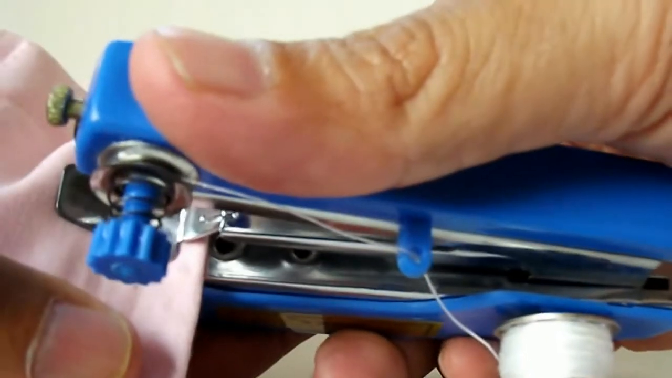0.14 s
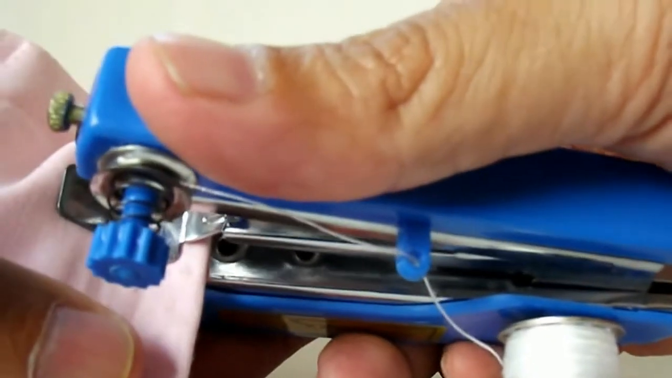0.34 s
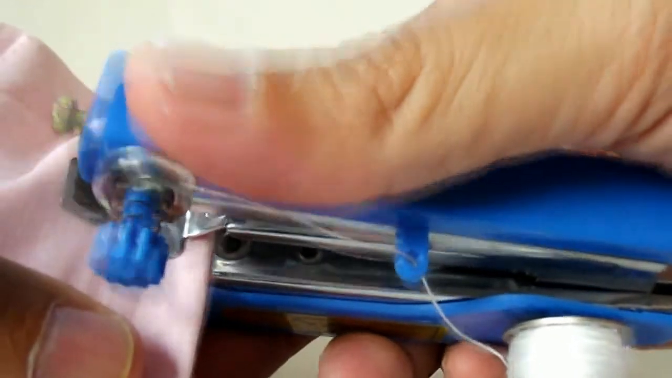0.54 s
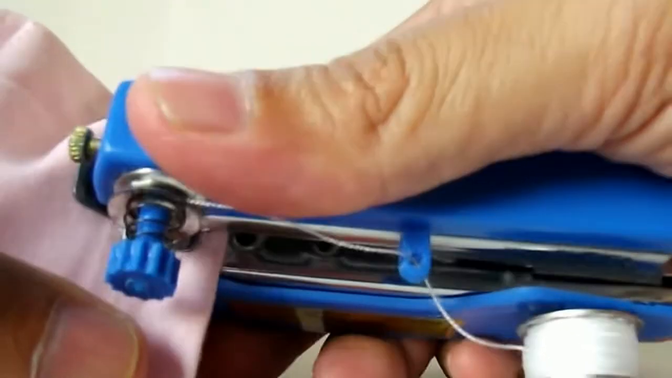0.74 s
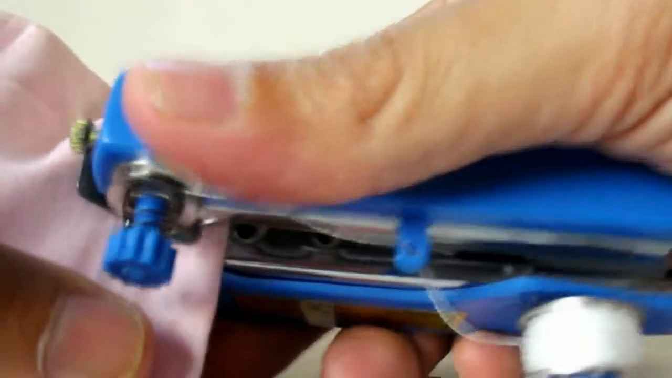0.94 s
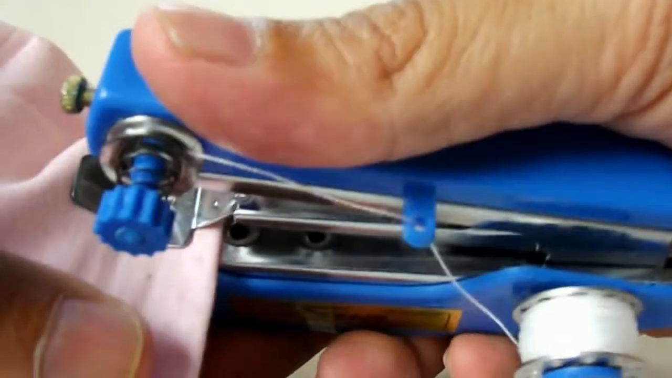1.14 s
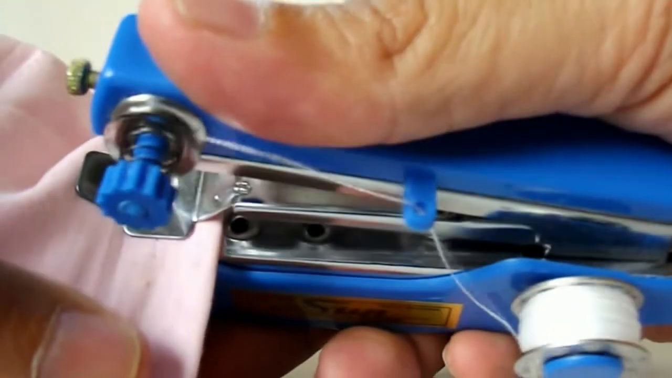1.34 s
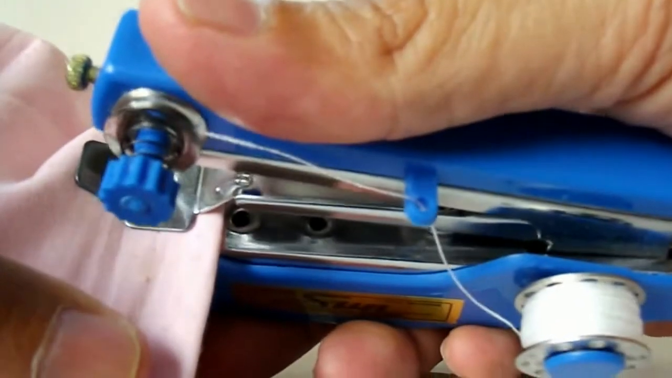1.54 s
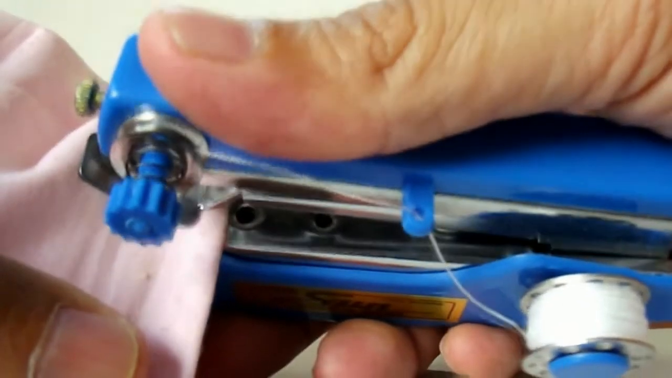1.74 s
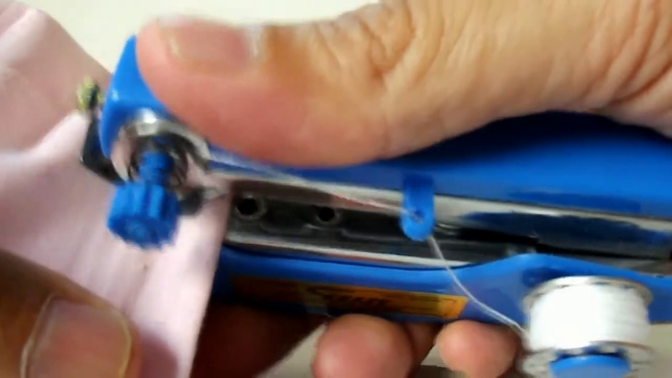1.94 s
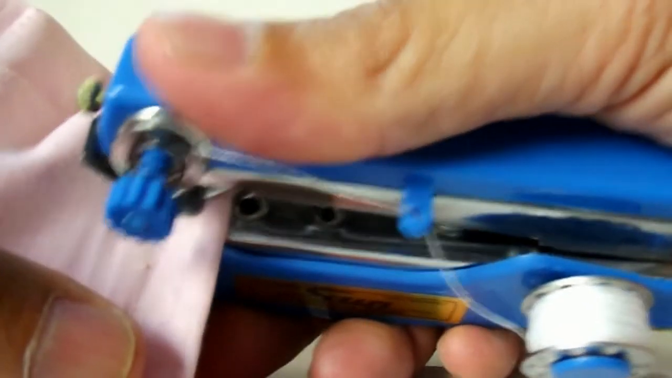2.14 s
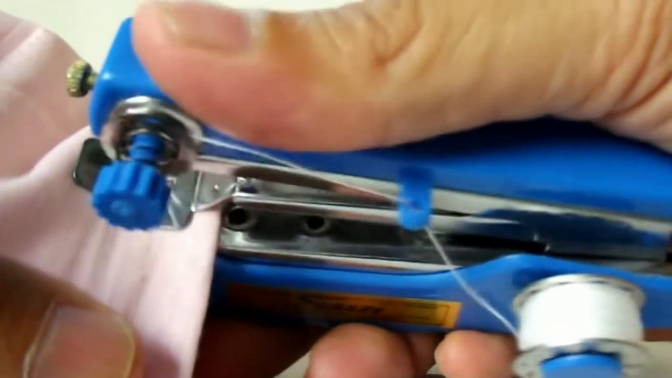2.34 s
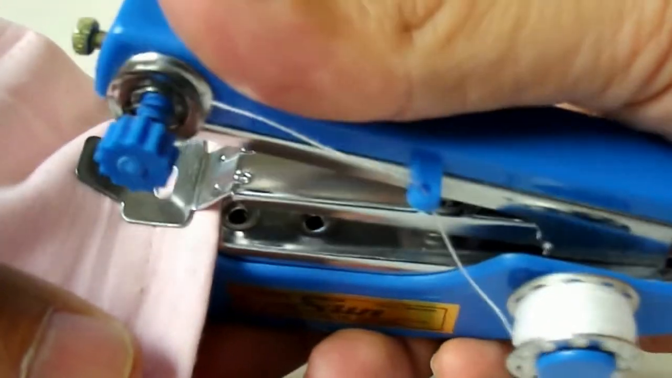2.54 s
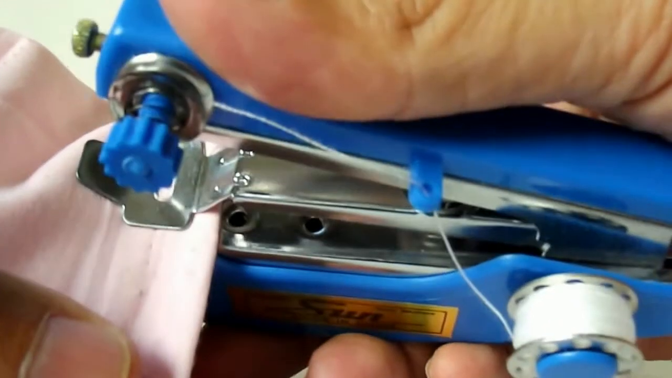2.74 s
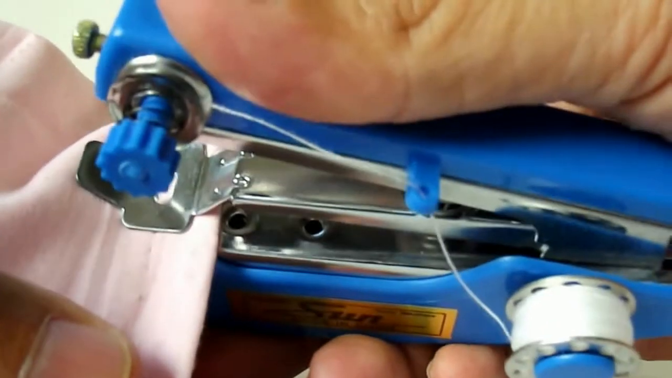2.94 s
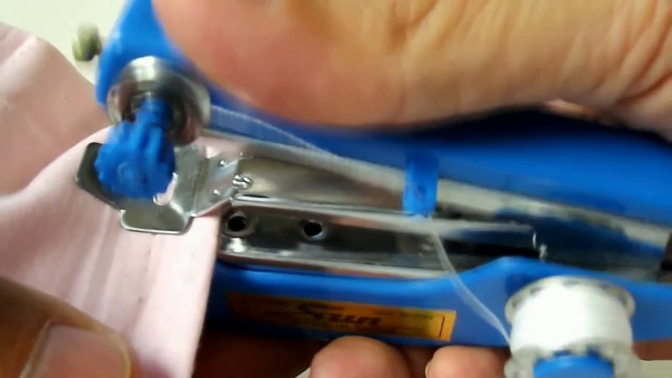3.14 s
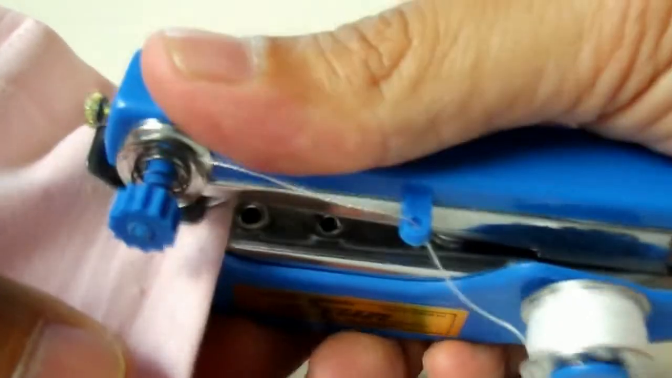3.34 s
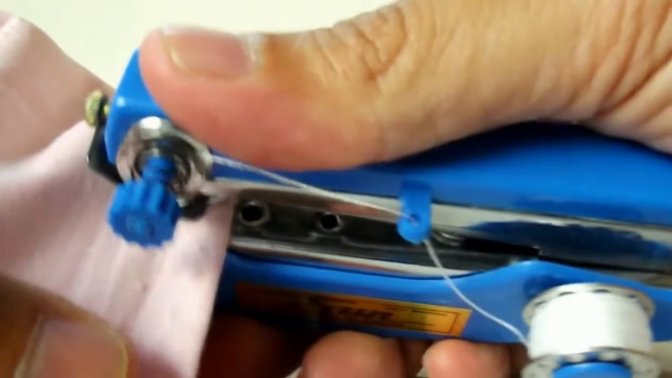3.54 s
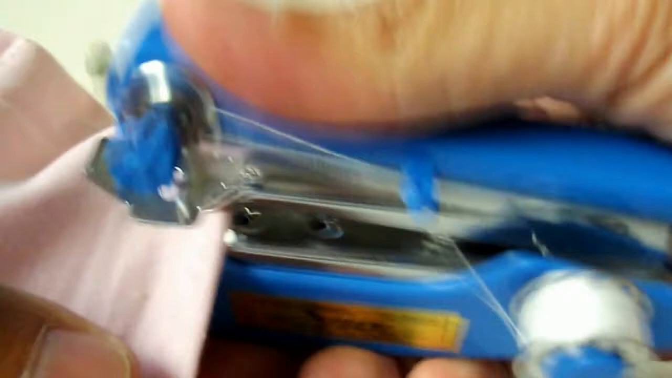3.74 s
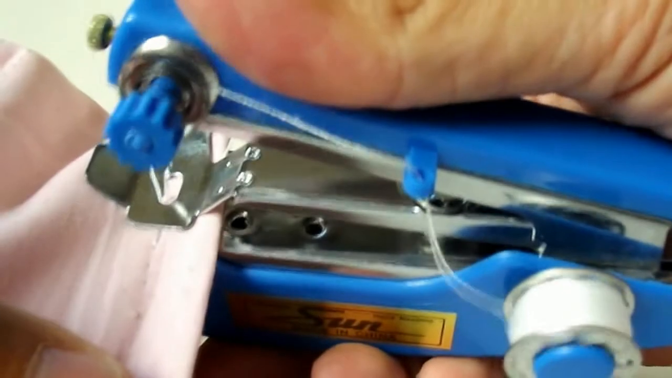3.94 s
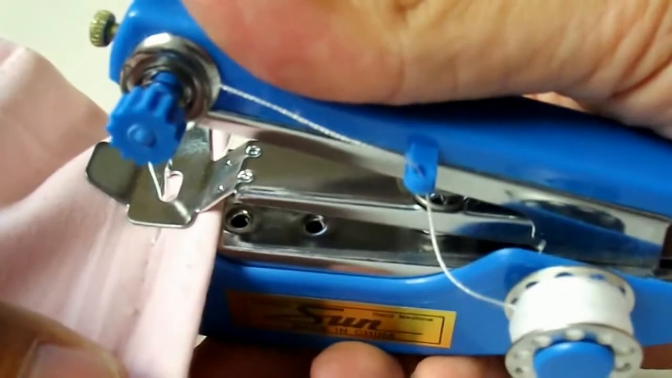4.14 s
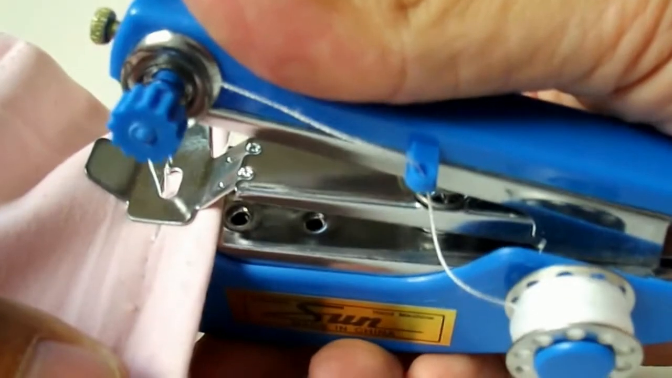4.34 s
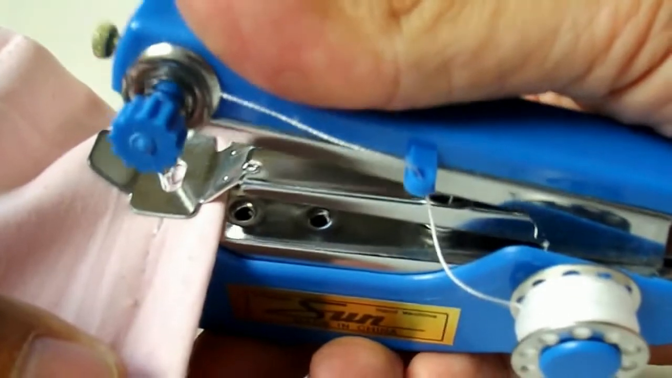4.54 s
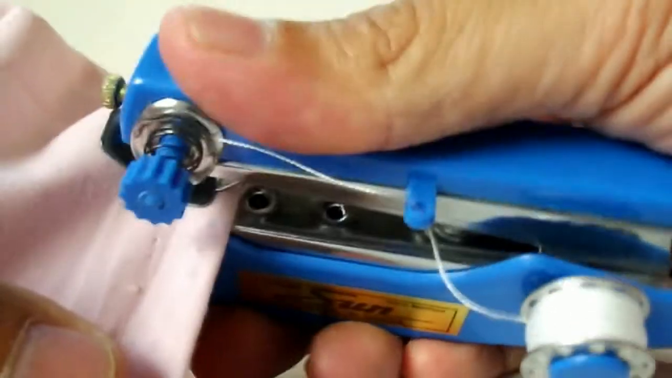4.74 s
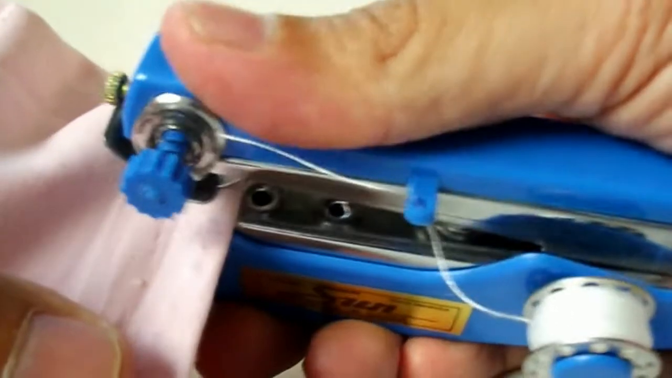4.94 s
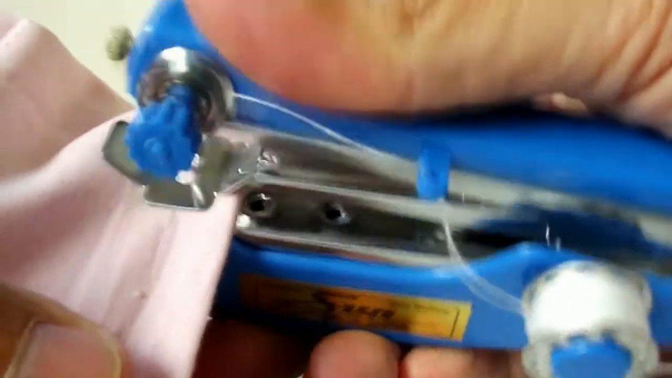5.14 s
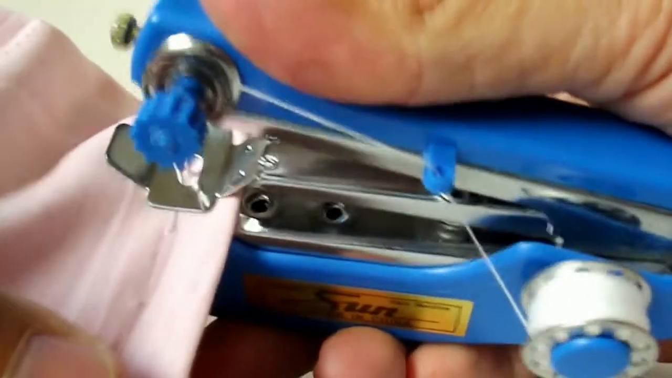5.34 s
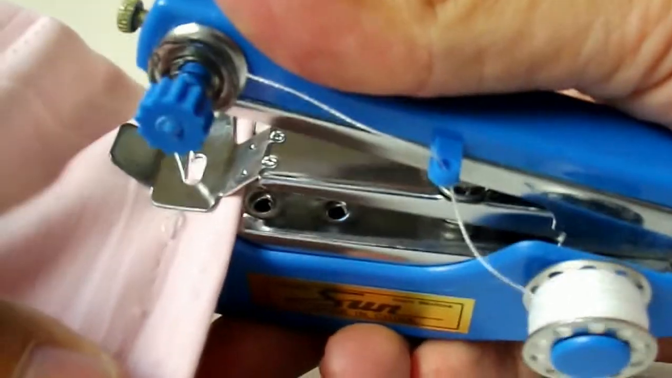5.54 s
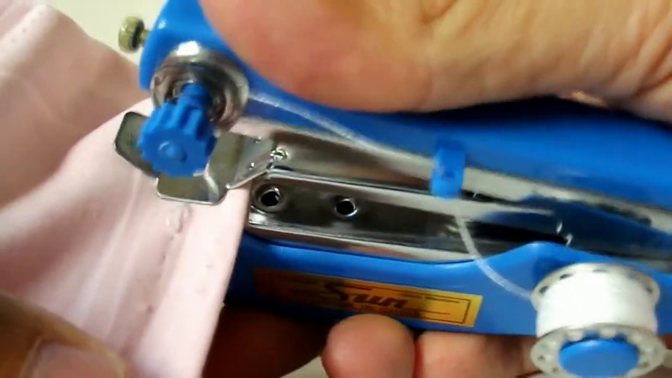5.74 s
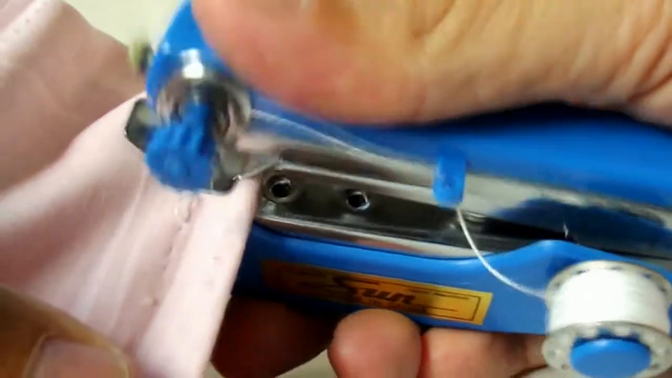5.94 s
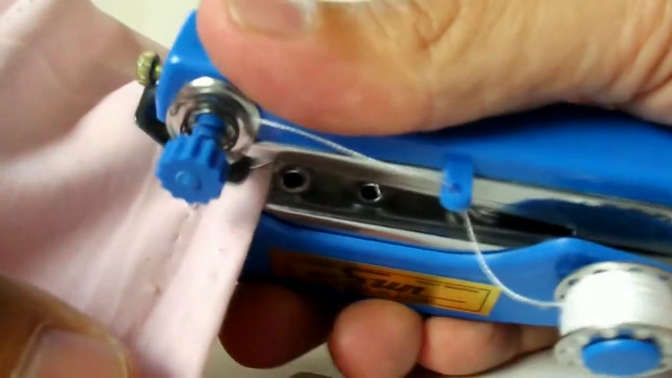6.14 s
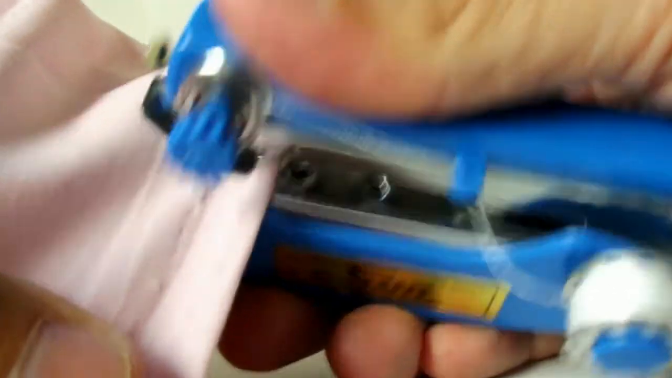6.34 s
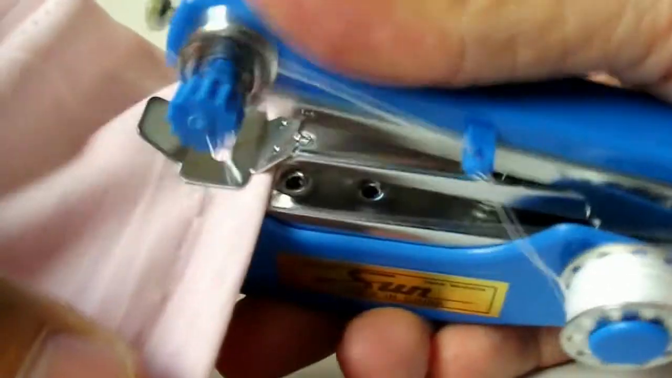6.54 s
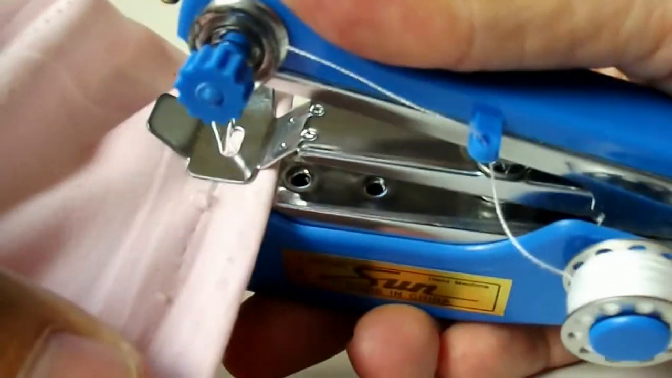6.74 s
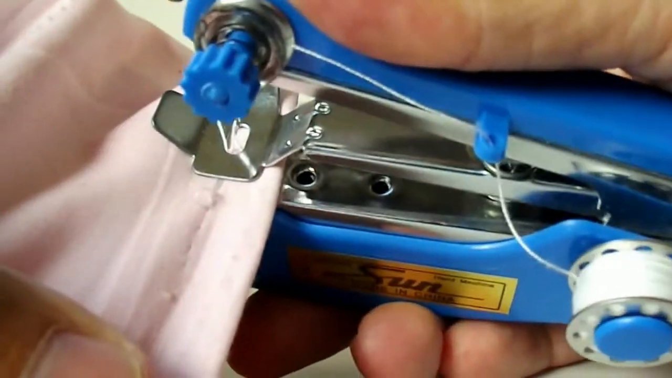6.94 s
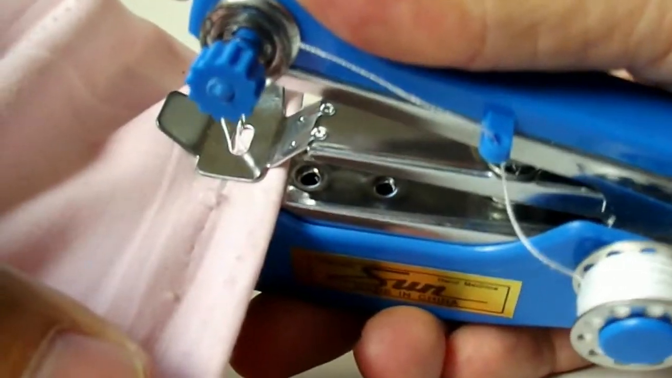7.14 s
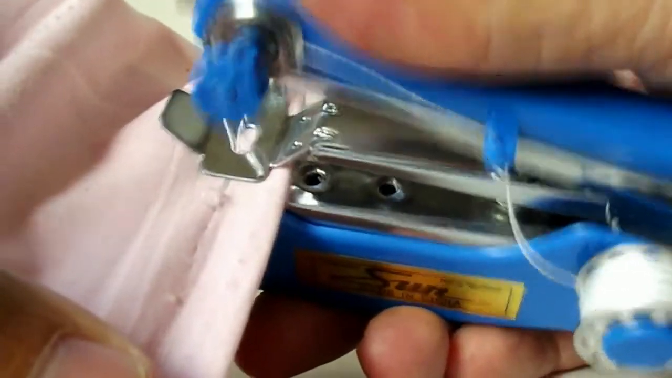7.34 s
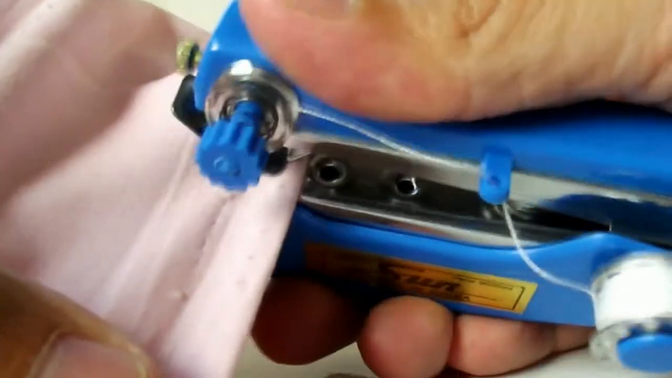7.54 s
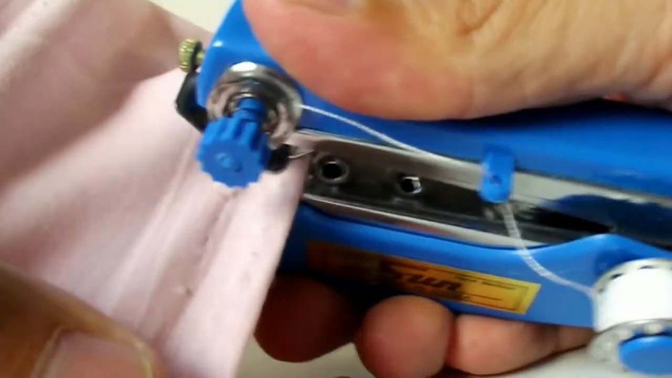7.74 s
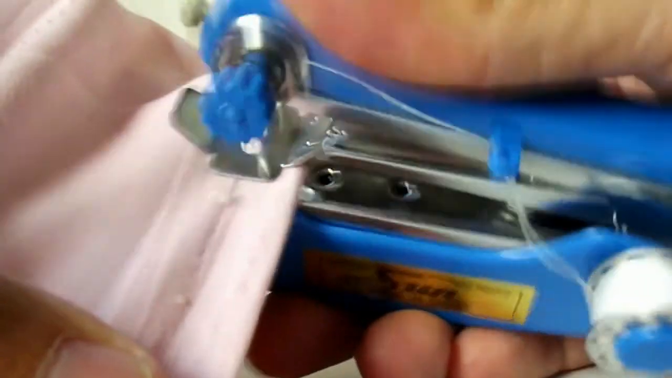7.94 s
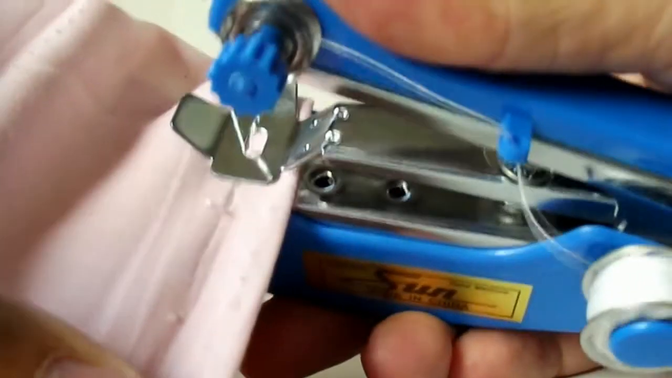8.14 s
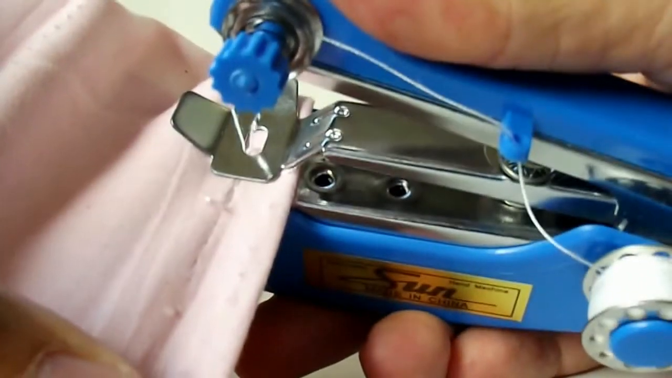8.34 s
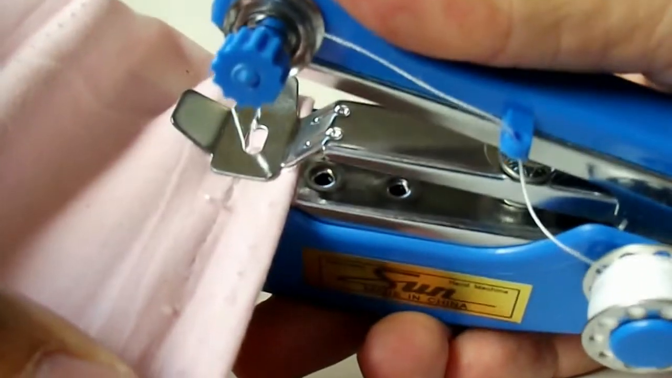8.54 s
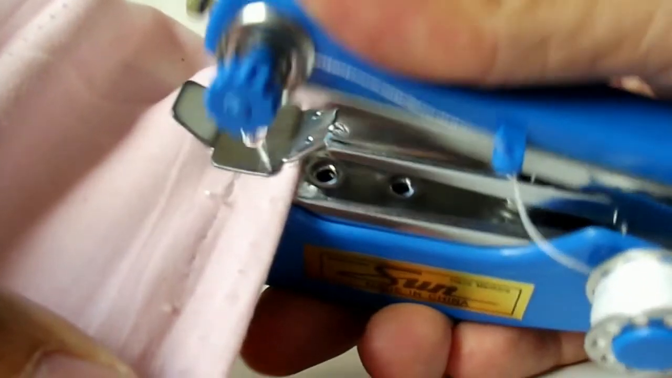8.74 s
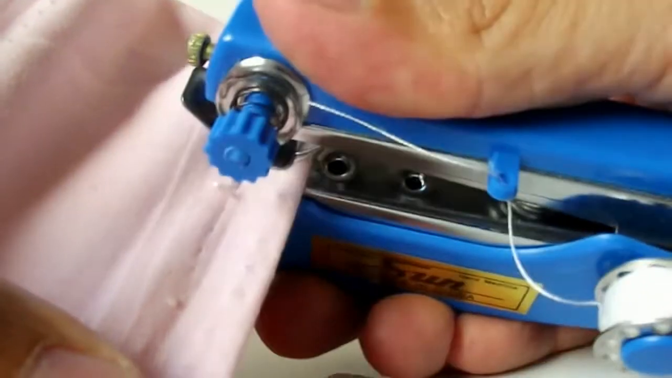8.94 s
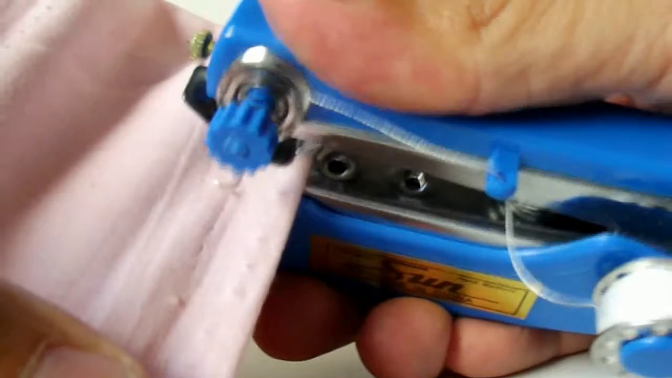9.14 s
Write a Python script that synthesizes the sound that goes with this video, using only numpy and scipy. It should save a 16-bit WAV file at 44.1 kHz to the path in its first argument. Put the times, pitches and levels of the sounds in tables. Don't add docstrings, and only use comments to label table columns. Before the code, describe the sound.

Very close to a small microphone in a quiet hard room, a hand-held stitcher is squeezed seven times in about nine seconds. Each squeeze slams shut with a hard, distorted steel clack; each release is a quick rattle of clicks, knocks and scrapes, with springs singing briefly. Between them lie room hiss and faint low street rumble, which duck after loud blows and creep back.

```python
import sys
import numpy as np
from scipy import signal
from scipy.fft import rfft, irfft
from scipy.io import wavfile
from scipy.ndimage import uniform_filter1d

SR = 44100
rng = np.random.default_rng(int(sys.argv[2]) if len(sys.argv) > 2 else 0)


def attenuation_scalar(level_db):
    decades = np.asarray(level_db, float) / 20
    return 10 ** decades


def transcribe(u):
    v = np.clip(np.atleast_2d(u).T, -1, 1)
    q = np.round(v * 32767).astype(np.int16)
    wavfile.write(sys.argv[1], SR, q)


N = 409688


def evened(x):
    return x / np.sqrt(np.mean(x ** 2) + 1e-20)


def read(points, hz):
    table_hz, value = np.transpose(points)
    return np.interp(np.log(hz + 1), np.log(table_hz + 1), value)


def add(mix, start_s, sound):
    part = mix[round(start_s * SR):][:len(sound)]
    part += sound[:len(part)]


def coloured(x, db_of_hz):
    return irfft(rfft(x) * attenuation_scalar(db_of_hz(np.fft.rfftfreq(len(x), 1 / SR))), len(x))


def bumps(hz, bands):
    return sum(height / (1 + (2 * (hz - centre) / width) ** 2) for centre, width, height in bands)


# pitch_hz, level_db (per Hz)
HISS = [(59, -26.5), (100, -4.5), (425, -3.5), (607, -8.5), (692, -12.5), (760, -8.5), (1170, -13.5),
        (1410, -7.5), (1940, -11), (2220, -27), (2480, -21), (4530, -39), (8900, -45), (11600, -55),
        (19600, -100)]
# pitch_hz, width_hz, rise_db
HISS_BANDS = [(1040, 100, 3.5), (1266, 100, 4), (1450, 39, 3), (2500, 59, 5.5), (3230, 52, 9),
              (4940, 100, 7.5), (5740, 90, 5.5), (6800, 99, -1)]
# pitch_hz, width_hz, level_db, share of motor load, share of traffic nearness
RUMBLE_BANDS = [(27, 37, -41, .3, .5), (49.5, 4.6, -39, 0.94, .01), (82.2, 12, -42, .1, 0.25),
                (200, 750, -44.5, .01, 1.97)]
# time_s, motor_load_db, traffic_nearness_db
STREET = [(0, -2, 5), (1.1, -3.5, -13), (2.0, -3, 3), (2.4, -9, 9.5), (3.1, -8, 0.5), (5, 7.5, -1),
          (5.35, 0, 0.5), (5.7, -1, 2), (6, -2, -0.5), (7, 3.5, 1), (7.6, 0.5, -3.5), (8.4, 6.5, -2.5),
          (8.75, -1.5, -8), (9.29, -4.5, 4.5)]


def background():
    hiss = coloured(rng.standard_normal(N), lambda hz: read(HISS, hz) + bumps(hz, HISS_BANDS))
    breath = evened(uniform_filter1d(rng.standard_normal(N), 2500))
    out = attenuation_scalar(-32 + 0.52 * breath) * evened(hiss)
    time_s, load_db, near_db = np.transpose(STREET)
    for centre, width, level_db, by_load, by_near in RUMBLE_BANDS:
        shape = [(centre, width, 1)]
        band = coloured(rng.standard_normal(N), lambda hz: 20 * np.log10(bumps(hz, shape)))
        street_db = np.interp(np.arange(N) / SR, time_s, by_load * load_db + by_near * near_db)
        out += attenuation_scalar(level_db + street_db) * evened(band)
    return out


# pitch_hz, time to fall 60 dB_s
ROOM_FADE = [(300, 0.18), (1000, 0.81), (1700, 0.77), (2700, 0.36), (4200, 0.83), (8000, 0.55)]
# pitch_hz, level_db
ROOM_COLOUR = [(500, -8), (1100, 6), (1650, 3), (2600, 5), (3500, 1.5), (4300, 5.5), (4900, 2),
               (5600, -0.5), (7500, 0.5), (9500, -4)]


def room(x):
    taps = np.zeros(SR // 2)
    at = np.arange(300, len(taps) - 20, 20)
    taps[at + rng.integers(0, 20, len(at))] = rng.choice([-1., 1.], len(at))
    hz, t, z = signal.stft(taps, SR, nperseg=256)
    fade_s = read(ROOM_FADE, hz)[:, None]
    gain = attenuation_scalar(read(ROOM_COLOUR, hz)[:, None] - 60 * t / fade_s) / np.sqrt(fade_s)
    tail = signal.istft(z * gain, SR, nperseg=256)[1]
    return signal.fftconvolve(x, tail / np.linalg.norm(tail))[:N]


def echoes(x):
    scatter_hz = (70.54, 190.4)
    turns = 2 * np.pi * np.outer(scatter_hz, np.arange(N)) / SR
    shares = (*np.cos(turns), *np.sin(turns))
    return sum(room(x * share) for share in shares) / np.sqrt(2)


def sing(rings, waver_hz, flutter_db, size=300, rise_s=0.002, fade_s=0.03):
    out = np.zeros(N)
    for start_s, length_s, pitch_hz, first_db, last_db in rings:
        t = np.arange(0, length_s, 1 / SR)
        noises = rng.standard_normal((2, SR // 2))
        waver, flutter = (evened(uniform_filter1d(v, size))[:len(t)] for v in noises)
        level_db = first_db + (last_db - first_db) * t / length_s + flutter_db * flutter
        ends = np.clip(np.minimum(t / rise_s, (length_s - t) / fade_s), 0, 1)
        phase = 2 * np.pi * np.cumsum(pitch_hz + waver_hz * waver) / SR
        add(out, start_s, np.sqrt(2) * attenuation_scalar(level_db) * ends * np.sin(phase))
    return out


COIL_HZ = 754
# start_s, length_s, pitch_hz, first_db, last_db
COIL_RINGS = [(1.815, 0.085, 612, -12.5, -27), (1.82, 0.15, 1304, -15.5, -50),
              (2.46, 0.32, 863, -38, -42.5), (5.08, 0.15, COIL_HZ, -20, -17),
              (5.22, 0.16, COIL_HZ, -27, -40), (5.35, 0.095, COIL_HZ, -28.5, -20.5),
              (7.85, 0.18, COIL_HZ, -21.5, -16), (9.19, 0.11, COIL_HZ, -26, -13.5)]
LEAF_RINGS = [(.15, 0.18, 573, -36.5, -33.5), (1.895, 0.21, 1650, -15, -42), (2.21, .1, 1690, -27, -33),
              (2.3, .27, 1710, -28, -38), (3.77, 0.21, 1690, -23, -41.5), (5.06, 0.17, 1643, -31, -31),
              (7.94, 0.076, 1730, -32, -55)]
CREAKS = [
    (4.39, 0.22, 1060, -33, -26),
    (4.72, 0.31, 1070, -37, -37),
]
STRAINS = [(4.455, .12, 690, -32, -29), (4.45, 0.15, 1500, -31.5, -30), (4.46, .09, 1920, -34, -36),
           (7.42, .14, 1400, -22, -32), (8.62, .1, 750, -36, -36), (8.58, .13, 1490, -35, -35),
           (1.45, .2, 1080, -39, -42), (5.62, .1, 620, -36, -40)]


def springs():
    out = sing(COIL_RINGS, waver_hz=6.9, flutter_db=0.5)
    out += sing(LEAF_RINGS, waver_hz=6.5, flutter_db=3.5)
    out += sing(CREAKS, waver_hz=40., flutter_db=4.5, size=90, rise_s=0.021)
    return out + sing(STRAINS, waver_hz=24.7, flutter_db=2.5, size=200, rise_s=0.01)


def body(x, modes):
    t = np.arange(2000) / SR
    ring = np.zeros(len(t))
    for k, (pitch_hz, width_hz, level_db) in enumerate(modes):
        fade = np.exp(-np.pi * width_hz * t)
        ring += (-1) ** k * attenuation_scalar(level_db) * np.sqrt(width_hz) * fade * np.sin(2 * np.pi * pitch_hz * t)
    return signal.oaconvolve(x, ring / np.linalg.norm(ring))[:N]


def landed(rows, colour):
    return [(start_s, force_db, *colour, ms) for start_s, force_db, ms in rows]


def contacts(rows, grit_db, rise, edge, brief, lead_s):
    force = np.zeros((3, N))
    for start_s, force_db, shell_db, plate_db, ms in rows:
        t = np.arange(-5, 5, 1000 / (ms * SR))
        u = abs(t / np.where(t < 0, rise, 1) / 2)
        for part, part_db, span in zip(force, (0., shell_db, plate_db), (1, 1, brief)):
            swell = attenuation_scalar(force_db + part_db) * np.exp(-(u / span) ** edge)
            add(part, start_s - lead_s - 5 * ms / 1000, swell)
    slips = evened(uniform_filter1d(rng.standard_normal(N), 50))
    grit = attenuation_scalar(grit_db * np.clip(slips, -3, 1.8))
    snags = signal.lfilter([1], [1, -.93], rng.random(N) < 150 / SR)
    return force * evened(grit * (0.5 + 0.13 * grit_db * snags)) * rng.standard_normal((3, N))


# start_s, force_db, stroke_ms
RELEASES = [(.94, -27, 10), (2.27, -30, 22), (3.655, -28.5, 14.5), (5.055, -27, 10), (6.362, -25.5, 14),
            (7.842, -23, 15), (9.168, -27, 16.4)]
# pitch_hz, width_hz, level_db
LOOSE_PLATE = [(3180, 280, 1.5), (3680, 490, 0), (4230, 610, -1)]


def loose_plate():
    rows = landed(RELEASES, (0., 0.))
    force = contacts(rows, grit_db=5.0, rise=1.0, edge=4.7, brief=0.97, lead_s=0.001)
    return body(force[2], LOOSE_PLATE)


# start_s, force_db, stroke_ms
ARM_STROKES = [(.5767, -15.5, 24), (.9349, -14, 1.6), (1.9496, -35, 4.6), (2.287, -17, 12),
               (2.5123, -28, 6.8), (3.3234, -22, 23), (3.8512, -41, 2.7), (4.6504, -14, 15),
               (5.155, -21.5, 8.9), (5.3419, -29.5, 6.5), (5.3718, -35, 3.7), (5.9255, -13, 18.4),
               (6.0093, -28, 4.7), (6.3645, -31.5, 17), (7.4122, -12.5, 7.7), (7.9449, -20, 24),
               (8.8549, -26.5, 56)]
CLOTH_STROKES = [(.435, -27.5, 35), (.9558, -10, 12.4), (1.2661, -25.5, 3.8), (1.8278, -22, 15),
                 (2.3437, -22.5, 26), (2.3966, -51, 4.1), (2.4574, -13, 18.4), (3.6836, -15, 23),
                 (3.7834, -28.5, 37), (4.5187, -31.5, 34), (5.0795, -24, 44), (5.1992, -29.5, 3.1),
                 (5.4197, -24, 29), (5.4756, -42, 8.6), (6.5611, -23.5, 15), (6.6449, -26.5, 25),
                 (7.2884, -30, 40), (7.459, -30, 36), (7.8502, -17, 18), (7.9898, -24, 39),
                 (8.0597, -34, 70), (8.655, -32, 19), (9.1831, -17, 10), (9.2679, -16.5, 52)]
JAW_STROKES = [(1.2342, -24, 4.4), (1.7091, -21, 28), (1.8987, -25.5, 23), (2.2609, -14.5, 18.4),
               (3.1459, -32.5, 38), (3.2396, -20.5, 22), (3.6427, -19.5, 7.3), (4.4668, -24, 4.9),
               (5.0535, -25, 15), (5.3159, -28, 8.6), (5.67, -35.5, 23), (6.3675, -14.5, 21),
               (6.5371, -27.5, 3.9), (7.8362, -17, 12), (8.779, -30.5, 51), (9.1532, -17, 5.2)]


def slides():
    strokes = landed(ARM_STROKES, (-6.5, -14)) + landed(CLOTH_STROKES, (3.1, -17.5))
    jaws = landed(JAW_STROKES, (4.8, -6.5))
    force = attenuation_scalar(-1.0) * contacts(strokes, grit_db=3.5, rise=0.71, edge=1.3, brief=0.97, lead_s=0.0054)
    return force + attenuation_scalar(-2.0) * contacts(jaws, grit_db=3.0, rise=0.65, edge=2.1, brief=0.78, lead_s=0.0023)


# start_s, force_db, contact_ms
ARM_TICKS = [(.5537, -12, 1.2), (.5945, -6, 2.7), (.6266, -17, 2.5), (.6515, -25, 1.8), (.89, -16, 1.5),
             (.9718, -7.5, 2.4), (1.2362, -20, 3.8), (1.2791, -20, 2.4), (2.194, -35, 2.4),
             (2.205, 8, 0.48), (2.211, -8.5, 2.6), (2.5123, -15, 1.6), (3.1429, -23, 2.3),
             (3.2035, -11, 1.3), (3.286, -11, 2.2), (3.2975, -16, 2.6), (3.3264, -15, 5),
             (3.5948, -23.5, 3.9), (4.5946, 0, 1.1), (5.0016, -23, 3.7), (5.1234, -23, 1.7),
             (5.4157, -18.5, 2.7), (5.4476, -23, 3.5), (6.3805, -12, 3.9), (6.4523, -24, 2),
             (6.578, -15, 4.2), (7.2884, -23.5, 7.6), (7.479, -12, 1.8), (7.8252, -11.5, 1.8),
             (8.828, -15, 3.6), (9.1053, -21, 2.7)]
HINGE_KNOCKS = [(.946, -5.5, 0.34), (1.269, -16.5, 2.2), (1.5814, -25, 2.2), (1.675, -22.5, 0.89),
                (1.8927, -7.5, 0.65), (2.3088, -16, 1.7), (2.4464, -17, 1.6), (3.6936, -6, 2),
                (3.7435, -22, 4), (3.7724, -16, 5.4), (3.794, -33, 2.2), (3.8313, -29, 2),
                (4.511, -21, 1.5), (4.5985, -2.5, 2.1), (5.037, -26, 2.3), (5.0525, -19, 7.5),
                (5.3748, -18.5, 2.2), (5.4197, -32, 1.2), (6.2977, -18, 1.2), (6.4204, -18, 6.7),
                (6.5202, -16, 1.6), (6.5451, -21, 0.71), (6.6459, -23, 0.44), (7.385, -15.5, 2.4),
                (8.0746, -42, 1.3), (8.6054, -33, 2.8), (9.224, -33, 4.2), (9.238, -18, 1.3)]
SHELL_BUMPS = [(.4041, -33, 1.4), (.5348, -13, 4.4), (.909, -35, 1.86), (.9638, -6.5, 1.66),
               (1.221, -33, 1.2), (2.4315, -13.5, 2.8), (2.4714, -16.5, 3.5), (2.5332, -34, 7.4),
               (3.1718, -35.5, 2.7), (3.6776, -8, 2.6), (3.8932, -34, 4.2), (5.0805, -16, 3.1),
               (5.3638, -29, 3.5), (5.8856, -16.5, 7.3), (7.2595, -34, 1.4), (7.931, -8, 4.7),
               (7.9868, -36, 0.7), (8.0008, -17, 1.6), (9.1871, -3.5, 0.86), (9.2889, -17.5, 2.5)]
PLATE_TAPS = [(.422, -29.5, 1.5), (.922, -17, 1.6), (1.6981, 5, 1.55), (1.7121, -8.5, 0.9),
              (1.816, -16, 1.8), (1.8857, -0.5, 1.9), (1.941, -19, 1.6), (2.222, -25, 2.1),
              (2.2579, -15, 3.2), (3.6317, -19, 2.7), (3.6557, -12.5, 1.6), (4.6125, 4, 0.58),
              (4.9986, -37, 0.91), (5.0455, -20, 5.5), (5.3269, -37, 3.4), (5.8816, -20, 1.9),
              (5.9295, 5.5, 2.8), (6.2797, -24.5, 1.15), (6.3385, -22, 1), (6.3446, -18, 1.9),
              (6.3975, -10, 0.87), (6.5332, -18.5, 3.4), (7.4531, -22, 0.65), (7.7753, -35, 2.3),
              (7.8152, -34, 1.3), (8.032, -37.5, 1.3), (8.683, -33, 2), (8.7352, -6.5, 2.3),
              (8.7711, -18, 6.5), (8.8319, -30, 1.9), (9.1452, -20.5, 1.5), (9.1662, -13.5, 2.9)]


def knocks():
    rows = landed(ARM_TICKS, (-20.5, -14)) + landed(HINGE_KNOCKS, (-0.53, -15))
    rows += landed(SHELL_BUMPS, (5.1, -8)) + landed(PLATE_TAPS, (2.8, -1.2))
    return contacts(rows, grit_db=-2.3, rise=0.72, edge=1.18, brief=0.89, lead_s=0.0014)


# start_s, force_db, shell_over_arm_db, plate_over_arm_db
RATTLE_SNAPS = [(0.9195, -20, -12, -14), (0.9228, -21.5, -11, -23), (0.9326, -4.5, -12, -12),
                (0.9457, -5, -4, -25), (0.9620, -0.5, 0.5, -19), (0.9742, -0.5, -6, -13),
                (1.2207, -23, 7, -26), (1.2301, -19, -12, -22), (1.2484, -17, -1, -15),
                (1.2762, -6, -5.5, -29), (1.8127, -13.5, -10, -20), (2.2212, -13, 3, -19),
                (2.241, -17, -7, -19), (2.2549, -11, -1, -9), (2.262, -14, 11, -18), (2.2792, -8, 3.5, -24),
                (2.2913, -0.5, -10, -32), (2.3334, -16, 8, -28), (2.4297, -10.5, -11, -17),
                (2.4449, 2, -3, -14), (2.4674, -7.5, -6, -10), (3.628, -10, -18, -18),
                (3.6374, -6, -12, -16), (3.6533, -5, -13, -22), (3.675, -8, -2, -16.5), (3.692, 0, -14, -22),
                (3.7154, -15.5, 4, -25), (3.7904, -21, -12, -25), (4.4633, -15, -8, -14),
                (4.5035, -25, -8, -10),
                (5.028, -21, -5, -3), (5.0406, -21, -7, -10), (5.049, -5, -5, -25), (5.0764, -14.5, 8.5, -19),
              (5.3048, -21, -14, -16), (5.3244, -20, -11, -19), (5.3616, -13, -2, -34),
              (5.4073, -12, 0, -24), (5.4435, -8, -8, -38), (6.34, -13.5, 1, -16.5), (6.345, -10, -13, -14),
              (6.359, -1.5, -9.5, -23), (6.3795, -2, -9, -21), (6.3864, -11, 5.5, -15),
              (6.515, -22, 0, -18), (6.5313, -5, -14, -21), (6.5444, -9.5, 2.5, -25), (6.553, -8, -2, -24),
              (6.5735, -10.5, -23, -22), (6.6425, -12, 1, -34), (7.451, -17, -13, -21),
              (7.4775, -10, -18, -24), (7.776, -25, -14, -12), (7.8128, -20, -13, -8),
              (7.8219, -10.5, -10, -11), (7.8358, -16.5, -9, -12), (7.915, -12.5, 6, -23),
              (7.929, -10, -1.5, -15), (7.9717, -13, 2, -16), (9.1431, -20, -12, -4),
              (9.1503, -10.5, -11, -14), (9.1612, -15, -5, -15), (9.1837, -3, -16, -19),
              (9.2386, -17, -1, -15), (9.27, -12, -4, -8)]
STRAY_SNAPS = [(0.5294, -5, -2, -2), (0.5516, -5, -15, -19), (0.5614, -12, -11, -3),
               (0.5741, -10, -17, -13), (0.5903, -7, -24, -16), (1.0365, -20, -9, -23),
               (1.519, -29, -6, -12), (1.7644, -25, -5, -22), (1.8894, -3.5, -16, -21),
               (1.949, -17, -21, -25), (2.1914, -16, -19, -22), (2.4516, -6, -1, -17),
               (2.5034, -17, -14, -21), (3.157, -18, 1, -25), (3.229, -3, -16, -7), (3.2464, -11, -17, -18),
               (3.2803, 5, -26, -32), (3.3014, -22, -14, -22), (3.5912, -22, -8, -11),
               (3.7398, -13, -6, -15), (3.7614, -14, -8, -20), (3.839, -21, -10, -21),
               (3.8876, -22, 3.5, -27), (3.9344, -20.5, -3, -19), (4.5344, -24, -2, -15),
               (4.6377, -12, 0, -14.5), (4.6488, -13, -12, -25), (5.0177, -22, 4, -17),
               (5.941, 3, -14, -22), (5.9708, -5, -13, -21), (6.0004, -23, -8, -15), (6.3498, -7, -8, -24),
               (6.393, -12, -6, -13), (6.402, -15, -12, -24), (6.4408, -15, -8, -27),
               (6.6114, -18, -4, -23), (7.3814, -3, -6.5, -11.5), (7.4074, 1, -21, -21),
               (7.46, -11, -15, -16), (7.4935, -21, -9, -18), (7.8637, -9.5, -6, -24),
               (7.941, -10, -10, -24), (7.9834, -16, -7, -15), (8.5932, -23.5, -8, -26),
               (8.7674, -15, -12, -11), (8.7914, -19, -9, -11), (8.8206, 2, -26, -29),
               (8.8624, -23, -12, -20), (9.2024, -12, -4, -16), (9.2214, -8, -4, -24)]


def snaps():
    force = np.zeros((3, N))
    strays = [(start_s, force_db + 0.5, *rest) for start_s, force_db, *rest in STRAY_SNAPS]
    click_db = (12, 20, 19)
    for k, (start_s, force_db, shell_db, plate_db) in enumerate(RATTLE_SNAPS + strays):
        blow = attenuation_scalar(force_db + np.array([0, shell_db, plate_db]) + click_db)
        force[:, round(start_s * SR)] += (-1) ** k * blow
    swing = round(SR / 1680)
    arm = 0.32 * np.roll(force[0], -swing) + .55 * force[0] + 0.32 * np.roll(force[0], swing)
    plate = signal.lfilter([.8], [1, -.55], force[2])
    return np.array([arm, force[1], plate])


# start_s, force_db, shell_over_arm_db, stroke_ms
SLAMS = [
    (.5143, 3, 1, 4.13),
    (3.2140, 3, -1, 4.95),
    (4.6115, 1, 6, 2.9),
    (7.3957, 4, 2, 2.86),
    (8.7479, 2.5, 2.5, 2.9),
]


def slams():
    plate_db = -3
    rows = [(start_s, force_db, shell_db, plate_db, ms) for start_s, force_db, shell_db, ms in SLAMS]
    return contacts(rows, grit_db=4.0, rise=0.91, edge=2.3, brief=0.95, lead_s=0.0008)


SHUT_AT = [.515, 1.698, 3.215, 4.605, 5.928, 7.395, 8.745]
# pitch_hz, width_hz, level_db
SHELL = [(423, 78, -4.5), (594, 89, 1.5), (832, 180, 1.5), (1048, 83, -6)]
SHUT_SHELL = [(402, 46, -12), (584, 120, -5), (836, 160, -1.5), (1028, 69, -4)]
ARM = [(1349, 45, 3.5), (1420, 75, 3), (1670, 195, 17), (1886, 73, -49), (1920, 150, -22.5)]
SHUT_ARM = [(1492, 268, 1), (1838, 290, 0)]
PLATE = [(3328, 260, -2.5), (3378, 164, 0.5), (3990, 190, -1.5), (4346, 79, -6), (4600, 2200, -13.5),
         (6200, 2200, -16), (7590, 1600, -5.5), (10050, 160, -21), (11600, 200, -21)]
CRACK = [(3400, 710, 3.5), (4700, 1900, -1.5)]


def stitcher():
    force = attenuation_scalar(-1.0) * (knocks() + slides() + slams()) + snaps()
    shut = abs(np.arange(N)[:, None] / SR - SHUT_AT).min(axis=1) < .03
    shell = attenuation_scalar(-4.0) * (body(force[1] * ~shut, SHELL) + body(force[1] * shut, SHUT_SHELL))
    arm = attenuation_scalar(2.0) * body(force[0] * ~shut, ARM) + attenuation_scalar(1.5) * body(force[0] * shut, SHUT_ARM)
    dull = signal.butter(N=3, Wn=2500., fs=SR, output="sos")
    ring = signal.sosfilt(dull, arm + shell)
    ring += attenuation_scalar(-5.0) * body(force[2], PLATE)
    ring += attenuation_scalar(-7.0) * body(force[2] * rng.choice([-1, 1], N), CRACK)
    no_bass = signal.butter(N=5, Wn=310., btype="high", fs=SR, output="sos")
    return signal.sosfilt(no_bass, ring)


def scene():
    near = stitcher()
    mono = background() + attenuation_scalar(-18.5) * echoes(near) + springs() + loose_plate() + near
    return np.array([mono, mono])


def top_cut(x):
    return signal.sosfilt(signal.butter(12, 14000, fs=SR, output="sos"), x)


def record(dry):
    x = signal.sosfilt(signal.butter(N=6, Wn=11000, fs=SR, output="sos"), dry[0])
    x = coloured(x, lambda hz: -8.5 * np.clip((hz - 9380) / 500 + .5, 0, 1))
    power_db = 10 * np.log10(abs(uniform_filter1d(x ** 2, 1500, origin=749)) + 1e-12)
    fall = np.arange(N) * 19.6 / SR
    cut_db = 0.41 * np.maximum(power_db + 20.5, 0)
    cut_db = np.maximum.accumulate(cut_db + fall) - fall
    lag = 1 / (0.03 * SR)
    late_cut_db = signal.lfilter([lag], [1, lag - 1], cut_db)
    x = np.clip(x / attenuation_scalar(late_cut_db), -1, 1)
    left = np.pad(x, (2, 0), "edge")[:N]
    return top_cut(np.array([left, x]))


dry = scene()
out = record(dry)
transcribe(out)
```